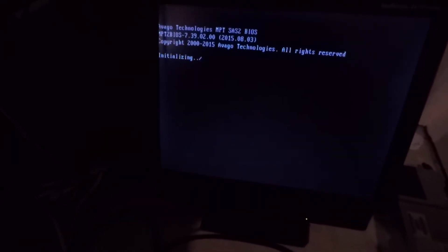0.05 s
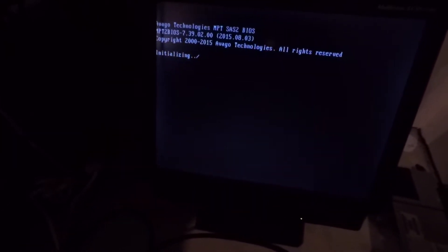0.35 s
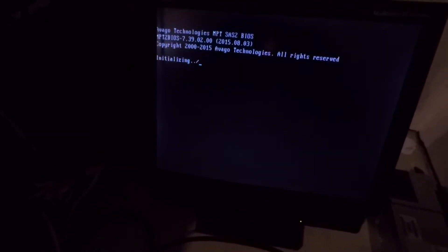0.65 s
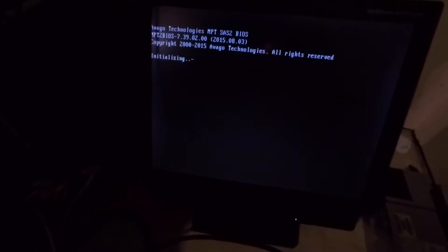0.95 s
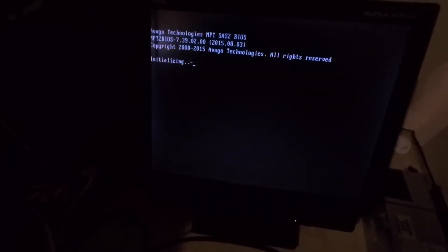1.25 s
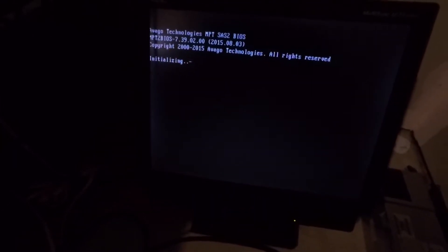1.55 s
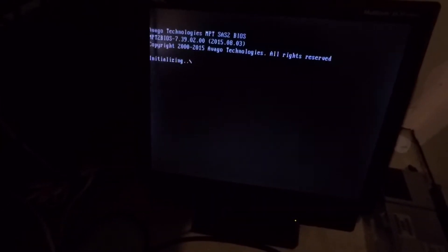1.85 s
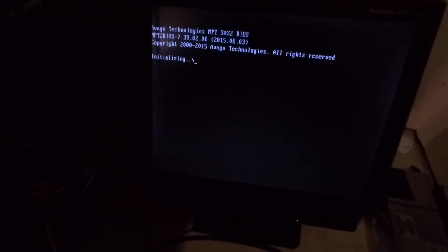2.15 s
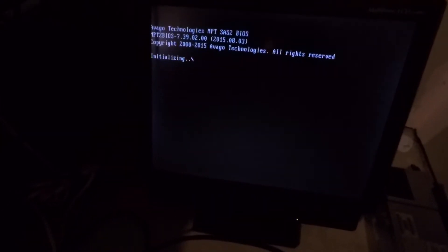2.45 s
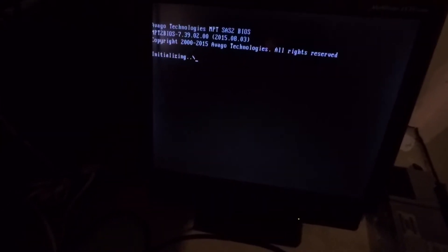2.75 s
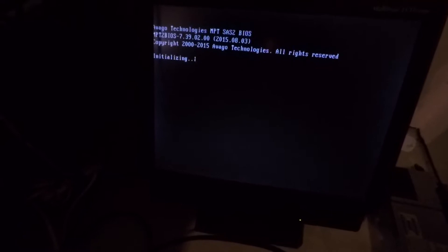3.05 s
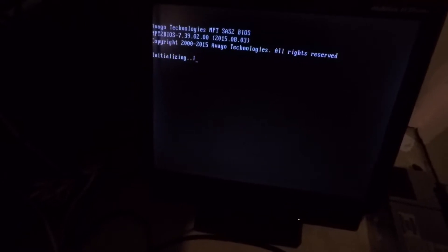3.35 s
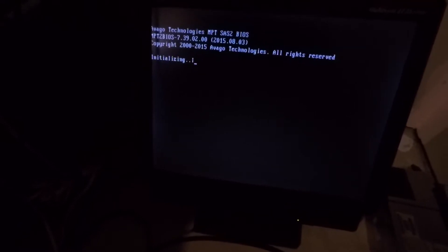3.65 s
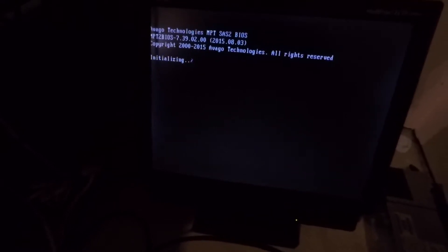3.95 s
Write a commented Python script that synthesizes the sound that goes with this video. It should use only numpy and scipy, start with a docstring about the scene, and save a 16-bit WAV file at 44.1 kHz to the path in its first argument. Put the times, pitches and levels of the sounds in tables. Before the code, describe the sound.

Computer server fans blow hard throughout, a rush of air with a pulsing whine, heard up close in a small room. A low drone sinks and dies out early, leaving steady hum and rumble underneath.

```python
"""A server runs at full fan speed in a small room, heard from close by through one microphone. From the start,
five fans at slightly different speeds sing blade tones that beat, while air rushes through the chassis, one
more fan and the motors whine and the mains hums. Underneath, a low drone sinks in pitch and dies away in the
first half. The fans throb on to the end over air, whine, hum and room rumble."""
import sys
import numpy as np
from scipy import signal
from scipy.fft import rfft, irfft
from scipy.io import wavfile
from scipy.ndimage import uniform_filter1d

SR = 44100
rng = np.random.default_rng(int(sys.argv[2]) if len(sys.argv) > 2 else 0)


def dump_mix(stems):
    """Bounce the given channels to the path in sys.argv[1] as a 16-bit WAV at rate SR."""
    frames = np.atleast_2d(stems).T  # one column per channel
    limited = np.clip(frames, -1, 1)  # hard clip at full scale
    pcm = np.round(limited * 32767).astype(np.int16)
    wavfile.write(sys.argv[1], SR, pcm)


N = 176400

# blade-passing pitch of each fan, the first three close enough to beat: f/Hz
BLADE_PITCHES = [574.9, 578.88, 584.36, 528.12, 604.72]
# blade harmonics 1 to 8, one row a fan: level/dB
BLADE_LEVELS = [(-34.3, -45.5, -52, -50, -50.5, -60, -62, -69),
                (-38.3, -41.3, -51.5, -45, -60, -70, -51.5, -51.5),
                (-43.3, -43.7, -54, -51, -46.5, -51.5, -67, -63),
                (-43.5, -47.5, -58, -41.8, -56, -61, -70, -54), (-66, -51, -65, -52.5, -60, -50, -57, -70)]
# thin tones: one more fan's blade tone at 568 Hz, then whines of motors and bearings: f/Hz, level/dB
MOTOR_WHINES = [(568, -49.5), (910, -50), (1820, -56), (2350, -59), (2728, -60), (2849, -59), (3667, -55.5),
                (4129, -58), (4146, -58), (6367, -67), (7012, -64), (7436, -67), (7527, -68), (10130, -66)]
# air rushing through the chassis, with its resonances: f/Hz, level/dB per Hz
AIR_SPECTRUM = [(150, -65), (162, -71), (182, -75), (192, -79), (214, -80), (250, -73.5), (293, -66.8),
                (360, -68.5), (380, -74), (405, -65), (425, -66), (452, -62.3), (480, -66), (511, -59.5),
                (545, -60.5), (576, -56), (610, -61.5), (635, -61), (660, -64.5), (690, -62), (770, -66.5),
                (830, -66.5), (858, -70.5), (911, -63), (985, -65.5), (1040, -64), (1075, -65.5),
                (1141, -61.5), (1217, -66.5), (1275, -65.5), (1350, -72), (1410, -63.5), (1480, -60.5),
                (1574, -68), (1733, -65.5), (1849, -68.3), (2102, -65.5), (2315, -67), (2391, -71),
                (2633, -71.5), (2880, -65), (3050, -66), (3298, -70.8), (3518, -69.5), (3874, -72),
                (4150, -68), (4400, -70.3), (4650, -68.3), (5000, -71.5), (6700, -77), (7100, -75.5),
                (8400, -80.5), (11200, -83), (12735, -82.5), (15200, -88)]
# low drone notes: start t/s, end t/s, first f/Hz, last f/Hz, level/dB
DRONE_NOTES = [(-0.054, 1.05, 71.2, 69, -41.5), (.3, 0.8, 120, 112, -46), (0.72, 1.62, 54.8, 54.2, -38.5),
               (1.1, 1.45, 95, 108, -43), (.9, 1.2, 27.4, 27, -45)]
# mains hum and its overtones: f/Hz, level/dB
MAINS_PARTIALS = [(60, -57), (120, -56.5), (180, -61)]
# low rumble of the room: f/Hz, level/dB per Hz
RUMBLE_SPECTRUM = [(12, -71), (25, -61.5), (42, -65.5), (58, -59), (78, -62), (115, -63.5), (145, -70),
                   (175, -92)]

IN_STEP_S = 2.12  # the first two fans' fundamentals line up here, and once every beat either side
WANDER_HZ, WANDER_PER_S, FLUTTER_PER_S = .05, 3, 25
SWELL_DB, SWELL_PER_S, RUMBLE_DB = .04, 5.19, .5
DRONE_FADE_S, TOP_HZ = .12, 15350


def fans(t):
    """Passing blades chop the air into a stack of harmonics; near-equal speeds make the sum throb."""
    out = np.zeros(N)
    for fan, (hz, levels) in enumerate(zip(BLADE_PITCHES, BLADE_LEVELS)):
        drift = np.cumsum(WANDER_HZ * walk(WANDER_PER_S)) / SR
        cycles = hz * (t - IN_STEP_S) + drift - np.interp(IN_STEP_S, t, drift)
        if fan >= 2:  # the other three fans come in at any phase
            cycles += rng.random()
        for harmonic, db in enumerate(levels, 1):
            offset = (harmonic > 1) * rng.random()
            out += tone(harmonic * cycles + offset, db, flutter=.06)
    return out


def airflow():
    """Rushing air, coloured by the chassis resonances and barely swelling."""
    return noise(AIR_SPECTRUM) * undb(-SWELL_DB * walk(SWELL_PER_S))


def whines(t):
    """One more fan and the spinning motors and bearings add thin tones, each wavering a little."""
    out = np.zeros(N)
    for hz, db in MOTOR_WHINES:
        drift_s = np.cumsum(.0002 * walk(WANDER_PER_S)) / SR
        out += tone(hz * (t + drift_s) + rng.random(), db, flutter=.25)
    return out


def drones(t):
    """Overlapping low notes fade in, glide and fade out; four sag in pitch and one rises."""
    out = np.zeros(N)
    for start, end, first_hz, last_hz, db in DRONE_NOTES:
        fade = np.clip(np.minimum(t - start, end - t) / DRONE_FADE_S + .5, 0, 1)
        hz = np.interp(t, [start, end], [first_hz, last_hz])
        out += fade * tone(np.cumsum(hz) / SR + rng.random(), db, flutter=.12)
    return out


def hum(t):
    """The mains hums at a steady pitch with two overtones."""
    return sum(tone(hz * t + rng.random(), db, flutter=.05) for hz, db in MAINS_PARTIALS)


def room_rumble():
    """A steady bed of low room noise."""
    return noise(RUMBLE_SPECTRUM) * undb(RUMBLE_DB)


def tone(cycles, db, flutter):
    """A sine that follows a running count of cycles, fluttering in level and phase."""
    shake = 1 + flutter * (walk(FLUTTER_PER_S) + 1j * walk(FLUTTER_PER_S))
    return np.sqrt(2) * undb(db) * np.real(shake * np.exp(2j * np.pi * cycles))


def noise(spectrum):
    """White noise shaped by an EQ curve, with a steep low cut below its first point."""
    hz, db = np.array(spectrum, float).T
    f = np.maximum(np.arange(N // 2 + 1) * SR / N, 1)
    curve = undb(np.interp(np.log(f), np.log(hz), db))
    low_cut = 1 / np.sqrt(1 + (hz.min() / f) ** 20)
    return irfft(rfft(rng.standard_normal(N)) * curve * low_cut, N) * np.sqrt(SR / 2)


def walk(rate):
    """A random modulator: values held for 1 / rate s and smoothed twice, with a spread near 1."""
    hold = max(int(SR / rate), 2)
    steps = np.repeat(rng.standard_normal(N // hold + 2), hold)
    return 1.3 * uniform_filter1d(uniform_filter1d(steps, hold), hold)[:N]


def undb(db):
    """Decibels to gain."""
    return 10 ** (np.asarray(db) / 20)


def scene():
    """All layers at one microphone, the same in both channels."""
    t = np.arange(N) / SR
    mono = fans(t) + whines(t) + airflow() + room_rumble() + hum(t) + drones(t)
    return np.array([mono, mono])


def record(dry):
    """A steep high cut takes off the very top."""
    high_cut = signal.ellip(12, .1, 80, TOP_HZ, fs=SR, output="sos")
    return signal.sosfilt(high_cut, dry)


dry = scene()
out = record(dry)
dump_mix(out)
```